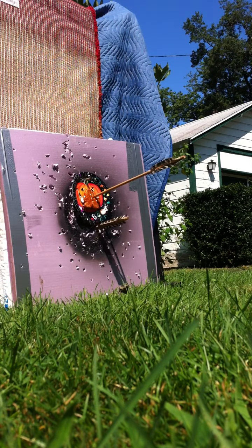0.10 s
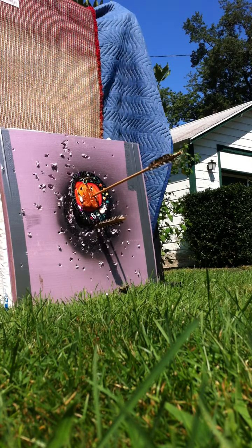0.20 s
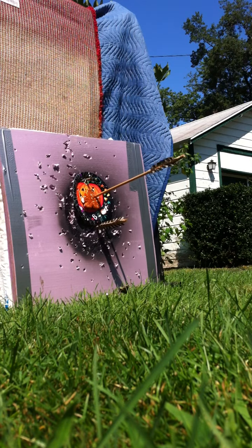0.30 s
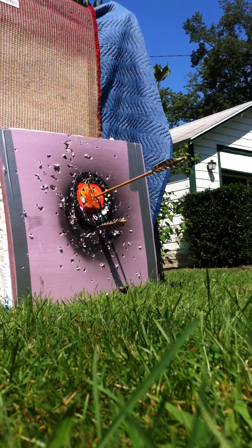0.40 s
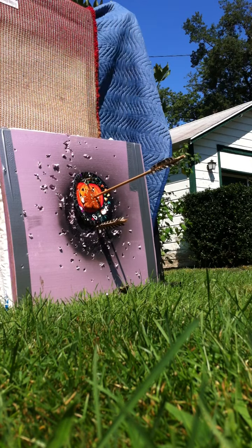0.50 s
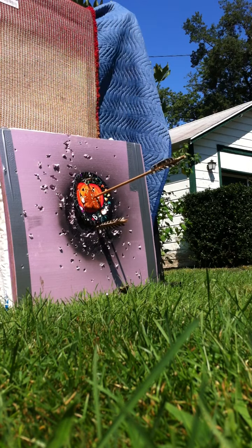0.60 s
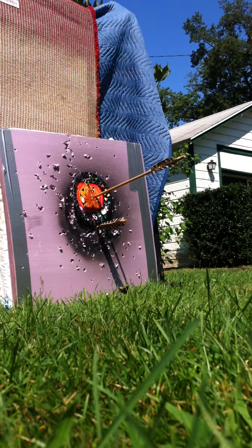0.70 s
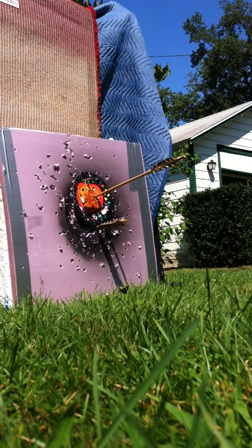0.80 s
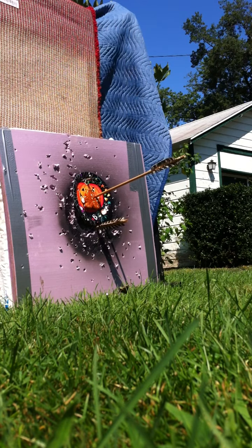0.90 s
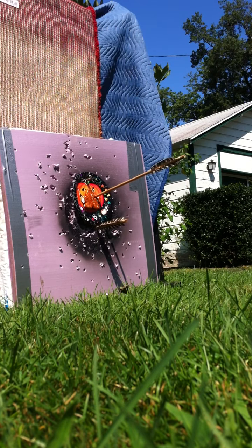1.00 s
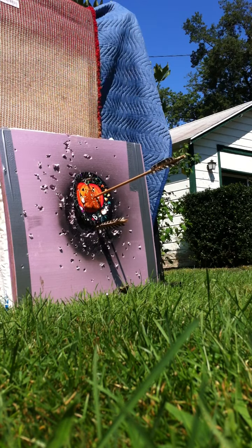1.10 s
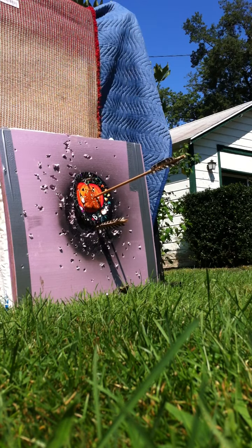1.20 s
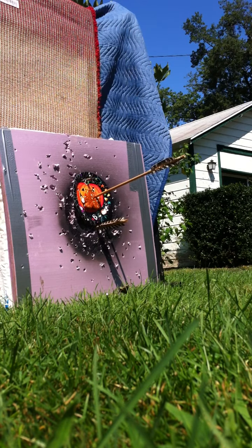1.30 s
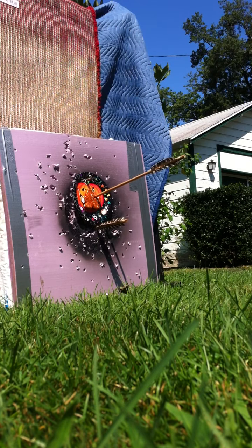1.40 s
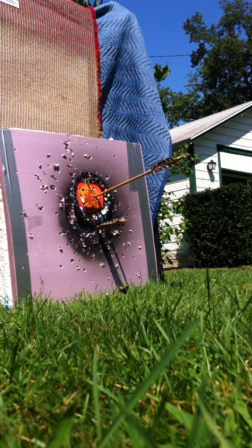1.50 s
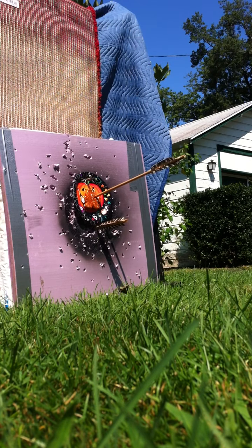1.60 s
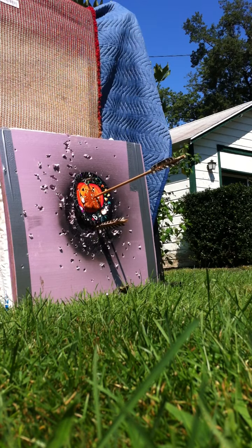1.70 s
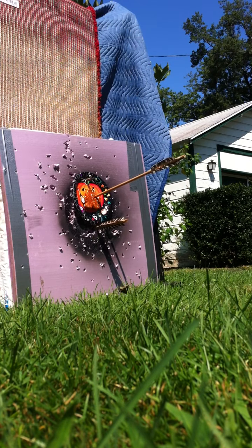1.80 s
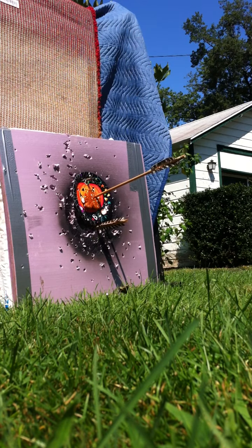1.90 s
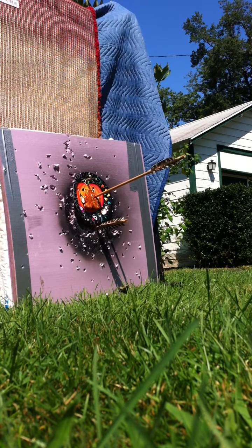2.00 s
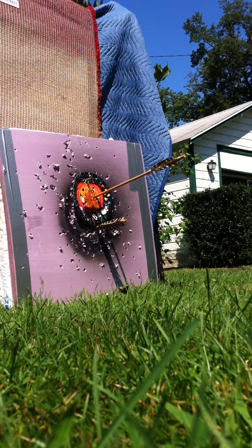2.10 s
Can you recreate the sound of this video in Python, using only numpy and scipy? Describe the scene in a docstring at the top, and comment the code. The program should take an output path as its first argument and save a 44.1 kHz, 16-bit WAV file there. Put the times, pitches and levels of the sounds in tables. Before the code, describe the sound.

An arrow hisses in briefly and strikes a foam target with one sharp, hollow thwack and quick shaft rattle, close to the microphone; afterward only quiet backyard air, high insect buzz, distant motor hum and a faint bird whistle.

```python
"""A backyard, with the microphone close to a foam target: an arrow hisses in and thwacks into the face.
Shaped noise makes the flight hiss, tip crack, shaft rattle, dull echo, small ticks and air.
Damped modes and tones make the block's hollow knocks, the shaft's ping and the target's deep bump.
Modulated tones make the insect drone (over a noise chorus), the distant motor's hum, a far engine's
fading throb and one thin falling bird whistle."""
import sys
import numpy as np
from scipy import signal
from scipy.fft import rfft, irfft
from scipy.io import wavfile

SR = 44100
rng = np.random.default_rng(int(sys.argv[2]) if len(sys.argv) > 2 else 0)


def file_out(sig):
    """Save sig as 16-bit WAV at sys.argv[1]."""
    # one column per channel
    cols = np.atleast_2d(sig).T
    # limit, then scale
    lim = np.clip(cols, -1, 1)
    pcm = np.round(lim * 32767).astype(np.int16)
    wavfile.write(sys.argv[1], SR, pcm)


N = 94815
T = np.arange(N) / SR  # seconds
HZ = np.fft.rfftfreq(N, 1 / SR)

# far engine's throb: time_s, level_db [rms]
THROB_LEVELS = [(0, -48), (.35, -47.5), (.62, -47.5), (.87, -52.5), (1.02, -49.5), (1.45, -52.5),
                (1.65, -55), (2.15, -72)]
# resonances sounded by each wing stroke: pitch_hz, waver_hz [rms], level_db [nearer insect], place [cycles]
WING_RESONANCES = [(8150, 70, -64.5, 0.05), (7940, 71, -70, 0.6), (7620, 45.7, -61.5, 0.68),
                   (7340, 60, -68, 0.56), (7180, 59.5, -68.5, 0.94)]
# smooth insect chorus, spectrum: frequency_hz, density_db [relative, per Hz]
CHORUS_SPECTRUM = [(5500, -26), (6800, -11.5), (7150, -5.5), (7600, -2), (8250, 0.5), (8600, -14),
                   (9100, -35)]
# distant motor's tones: pitch_hz, early_level_db, late_level_db
MOTOR_TONES = [(88.4, -64, -68), (172, -60, -49), (262, -57, -53), (290, -64, -66), (347, -64, -65.5),
               (425.4, -66, -67), (517, -77, -77)]
# air of the yard, spectrum: frequency_hz, density_db [relative, per Hz]
AIR_SPECTRUM = [(20, -27), (48, -30), (66, -23), (88, -9), (170, 2.5), (260, -1.5), (380, -9), (600, -14.5),
                (950, -17.5), (1500, -27.5), (2500, -25.5), (4000, -30.5), (6400, -29.5), (9500, -37.5),
                (15500, -37.5)]
# fletching hiss in flight, spectrum: frequency_hz, density_db [relative, per Hz]
FLIGHT_SPECTRUM = [(1000, -16), (2000, -6.5), (3000, -1.5), (4500, -3.5), (6300, -3), (9500, -6),
                   (12000, -5.5), (15500, -9)]
# tip cracking through the face, spectrum: frequency_hz, density_db [relative, per Hz]
CRACK_SPECTRUM = [(500, 4.5), (1300, -9), (2600, -4.5), (3400, -7.5), (4100, 3.5), (4800, -13), (6000, 4.5),
                  (7200, -10.5), (9700, -18.5), (11800, -4), (13300, -8), (15500, -18)]
# shaft's rattle, spectrum: frequency_hz, density_db [relative, per Hz]
RATTLE_SPECTRUM = [(300, 4.5), (1000, 2), (1600, -3.5), (2100, -3), (2700, 0), (5000, -0.5), (8000, -7),
                   (9700, -30), (11800, -7.5), (15500, -17)]
# yard's dull echo, spectrum: frequency_hz, density_db [relative, per Hz]
ECHO_SPECTRUM = [(30, -32), (70, -24), (110, -6), (230, 8), (450, 5), (700, -4), (1100, -22), (1600, -26),
                 (4000, -42)]
# shaft's short ring: pitch_hz, level_db [peak], t60_s
SHAFT_MODES = [(2607, -35, 0.11), (3143, -37, 0.077), (4013, -24.5, 0.018), (5340, -24.5, 0.019),
               (5970, -21.5, 0.02)]
# jolts of the block: centre_s, level_db [peak of the push], contact_s [shorter is harder]
BLOCK_JOLTS = [(0.2366, -21, 0.0005), (0.2378, -24, .00078), (0.2397, -17, 0.00035), (0.248, -14, .00032),
               (0.2526, -17, 0.0007)]
# modes of the foam block: pitch_hz, boost_db, t60_s
BLOCK_MODES = [(124, 3.5, 0.19), (204.4, 8.5, 0.1), (265.3, 8, 0.13), (344, 19, 0.049), (427, 14.5, 0.046),
               (513, 13.5, 0.086), (756, 8.5, 0.078), (842, 4, 0.071), (896, 4, 0.081), (1098, 10.5, 0.076),
               (1264, 9, 0.031)]
# small ticks: start_s, level_db, t60_s, treble_db [above 7 kHz, relative to the rest of the tick]
TICK_EVENTS = [(0.2524, -32.5, 0.036, -3), (0.288, -39.5, 0.015, 7), (0.2945, -43, 0.012, 9),
               (.342, -56.5, 0.091, -3), (2.101, -50.5, 0.019, -8), (2.115, -59, .05, -8)]
# ticks before their treble change, spectrum: frequency_hz, density_db [relative, per Hz]
TICK_SPECTRUM = [(800, -17), (2800, -0.5), (6300, -3), (9500, -7), (12000, -10), (15500, -12)]
# bird whistle: time_s, pitch_hz, level_db [peak of the tone before flutter]
BIRD_PATH = [(1.04, 3360, -77), (1.08, 3370, -68), (1.125, 3370, -66.5), (1.149, 3310, -64.5),
             (1.24, 3220, -63.5), (1.33, 3070, -64), (1.37, 2980, -76)]

HIT_S = .2347
THROB_HZ, EXHAUST_HZ, EXHAUST_WIDTH_HZ = 33.94, 176.3, 37  # firing rate, resonance, its width
STROKE_HZ, STROKE_DEPTH = 48.06, 1.33
SECOND_STROKE_HZ, SECOND_DB = 53.4, -11.5  # second insect, level relative to the first
CHORUS_DB, AIR_DB = -60, -52.5
HUM_CHANGE_S, HUM_CHANGE_LENGTH_S = 1.606, .16  # middle and length of the balance shift
HUM_WAVER, HUM_WAVER_DB = 0.0042, 1.17  # rms pitch waver as a fraction, rms level waver
FLIGHT_DB, FLIGHT_NEAR_S = -49.5, 0.063  # level at the hit; time before it when gain is half
CRACK_DB, CRACK_HOLD_S, CRACK_T60_S = -18, 0.0019, 0.0098
RATTLE_DB, RATTLE_T60_S = -27.5, 0.16
RATTLE_GRAIN_DB, RATTLE_GRAIN_HZ = 3, 302  # rms unevenness and its rate
ECHO_DB, ECHO_RISE_S, ECHO_T60_S = -39, 0.022, 0.2
BLOCK_LOW_HZ = 96  # low-cut corner
SWAY_HZ, SWAY_DB, SWAY_RISE_S = 110.7, -30.5, 0.014
BIRD_FLUTTER, BIRD_FLUTTER_HZ = .42, 90  # rms depth and rate
EDGE_HZ = 15900  # upper band limit


def amp(db):
    """Decibels to gain."""
    return 10 ** (np.asarray(db) / 20)


def unit(x):
    """Scales to rms 1."""
    return x / np.sqrt(np.mean(x ** 2) + 1e-20)


def noise(gain):
    """Unit noise with the given gain at each frequency."""
    spectrum = rfft(rng.standard_normal(N)) * gain
    return unit(irfft(spectrum, N))


def coloured(points):
    """Unit noise with a spectrum of (Hz, dB) points, joined along log frequency."""
    hz, db = np.transpose(points)
    return noise(amp(np.interp(np.log(HZ + 1), np.log(hz), db)))


def drift(rate_hz):
    """Random wander of rms 1, mostly slower than the given rate."""
    return noise((HZ > 0) / (1 + (HZ / rate_hz) ** 4))


def burst(start, rise, t60, hold=0):
    """Envelope with a linear attack and exponential release; hold counts from the start."""
    age = T - start
    attack = np.clip(age / rise, 0, 1)
    release = np.exp(-np.log(1000) * np.maximum(age - hold, 0) / t60)
    return attack * release


def throb():
    """A far engine's regular pulses ring a low exhaust resonance and fade away."""
    turns = np.cumsum(THROB_HZ + 0.14 * drift(4.1)) / SR + rng.random()
    orders = np.arange(3, 10)[:, None]  # harmonics of the firing rate
    response = 1 / (1 + 2j * (orders * THROB_HZ - EXHAUST_HZ) / EXHAUST_WIDTH_HZ)
    pulses = (response * np.exp(2j * np.pi * orders * turns)).real.sum(0)
    times, levels = np.transpose(THROB_LEVELS)
    return amp(np.interp(T, times, levels)) * unit(pulses)


def motor():
    """Wavering low tones from a distant motor, whose balance shifts once."""
    late = np.clip((T - HUM_CHANGE_S) / HUM_CHANGE_LENGTH_S + .5, 0, 1)
    out = np.zeros(N)
    for hz, early_db, late_db in MOTOR_TONES:
        turns = np.cumsum(hz * (1 + HUM_WAVER * drift(4.54))) / SR + rng.random()
        level_db = early_db + (late_db - early_db) * late + HUM_WAVER_DB * drift(4.4)
        out += amp(level_db) * np.sin(2 * np.pi * turns)
    return np.sqrt(2) * out  # makes the tone levels rms


def insect(stroke_hz):
    """Unsteady high wing resonances swell at their own places in every stroke."""
    cycle = np.cumsum(stroke_hz + 0.25 * drift(2.4)) / SR
    out = np.zeros(N)
    for hz, waver_hz, db, place in WING_RESONANCES:
        stroke = unit(np.exp(STROKE_DEPTH * np.cos(2 * np.pi * (cycle - place))))
        turns = np.cumsum(hz + waver_hz * drift(149)) / SR
        out += amp(db) * stroke * unit(np.sin(2 * np.pi * turns))
    return out


def insects():
    """Two nearer insects drone over a smooth chorus of shaped noise."""
    nearer = insect(STROKE_HZ) + amp(SECOND_DB) * insect(SECOND_STROKE_HZ)
    return nearer + amp(CHORUS_DB) * coloured(CHORUS_SPECTRUM)


def air():
    """Steady noise of the yard's air, strongest in the lows."""
    return amp(AIR_DB) * coloured(AIR_SPECTRUM)


def flight():
    """The fletching hisses louder as the arrow closes in, and stops at the hit."""
    distance = 1 + (np.maximum(HIT_S - T, 0) / FLIGHT_NEAR_S) ** 2
    return amp(FLIGHT_DB) * coloured(FLIGHT_SPECTRUM) * (T < HIT_S) / distance


def crack():
    """The tip cracks through the face in a very short noise burst."""
    return amp(CRACK_DB) * coloured(CRACK_SPECTRUM) * burst(HIT_S, 0.00015, CRACK_T60_S, CRACK_HOLD_S)


def rattle():
    """The shaft rattles unevenly: decaying noise with a random grain."""
    body = amp(RATTLE_DB) * burst(HIT_S, 0.00088, RATTLE_T60_S)
    grain = unit(amp(RATTLE_GRAIN_DB * drift(RATTLE_GRAIN_HZ)))
    # the body is an envelope; the grain roughens it
    return body * grain * coloured(RATTLE_SPECTRUM)


def echo():
    """The yard answers dully with low noise that swells, then dies away."""
    return amp(ECHO_DB) * coloured(ECHO_SPECTRUM) * burst(HIT_S, ECHO_RISE_S, ECHO_T60_S, ECHO_RISE_S)


def shaft():
    """The stiff shaft pings for an instant before the foam damps it."""
    out = np.zeros(N)
    for hz, db, t60 in SHAFT_MODES:
        out += amp(db) * burst(HIT_S, 0.00072, t60) * np.sin(2 * np.pi * hz * (T - HIT_S))
    return out


def sway():
    """The whole target gives way with a slower, deeper bump."""
    age = np.maximum(T - HIT_S, 0)
    swell = (age / SWAY_RISE_S * np.exp(1 - age / SWAY_RISE_S)) ** 2
    return amp(SWAY_DB) * swell * np.sin(2 * np.pi * SWAY_HZ * age)


def block():
    """The foam block jolts as it stops the arrow; every jolt rings the same damped modes."""
    t = T[:SR // 2]
    ring = signal.unit_impulse(len(t))  # the push itself is heard too
    for hz, db, t60 in BLOCK_MODES:
        damping = np.log(1000) / t60
        mode = np.exp(-damping * t) * np.cos(2 * np.pi * hz * t)
        ring += amp(db) * 2 * damping / SR * mode
    pushes = np.zeros(N)
    for centre, db, contact in BLOCK_JOLTS:
        u = (centre - T) / contact
        pushes += amp(db) * u * np.exp(.5 - u ** 2 / 2)  # out, then back
    low_cut = signal.butter(3, BLOCK_LOW_HZ, "high", fs=SR, output="sos")
    return signal.sosfilt(low_cut, signal.fftconvolve(pushes, ring)[:N])


def ticks():
    """Small dry ticks of decaying noise, some bright and some dull."""
    out = np.zeros(N)
    for start, db, t60, treble_db in TICK_EVENTS:
        spectrum = [(hz, level + treble_db * (hz > 7000)) for hz, level in TICK_SPECTRUM]
        out += amp(db) * burst(start, 0.00035, t60) * coloured(spectrum)
    return out


def bird():
    """One far, fluttering whistle: a single tone that slides down."""
    times, hz, db = np.transpose(BIRD_PATH)
    turns = np.cumsum(np.interp(T, times, hz) + 18 * drift(70)) / SR
    flutter = unit(abs(1 + BIRD_FLUTTER * drift(BIRD_FLUTTER_HZ)))
    sounding = (T > times[0]) * (T < times[-1])
    return amp(np.interp(T, times, db)) * flutter * sounding * np.sin(2 * np.pi * turns)


def scene():
    """The shot, close to the microphone, over the sounds of the yard."""
    shot = flight() + crack() + rattle() + echo() + shaft() + block() + sway()
    yard = ticks() + insects() + motor() + throb() + bird() + air()
    return (shot + yard)[None]


def record(dry):
    """The recorder's band limit: a linear-phase low-pass."""
    low_pass = signal.firwin(511, EDGE_HZ, window=("kaiser", 9), fs=SR)
    return signal.oaconvolve(dry, low_pass[None], "same")


dry = scene()
out = record(dry)
file_out(out)
```